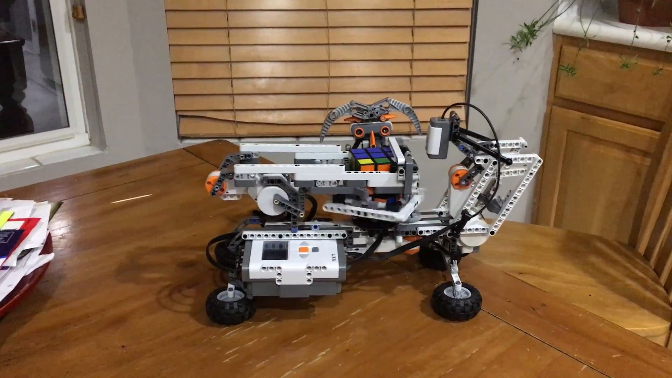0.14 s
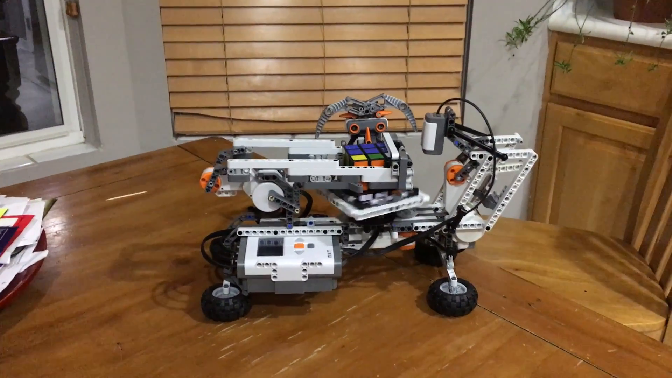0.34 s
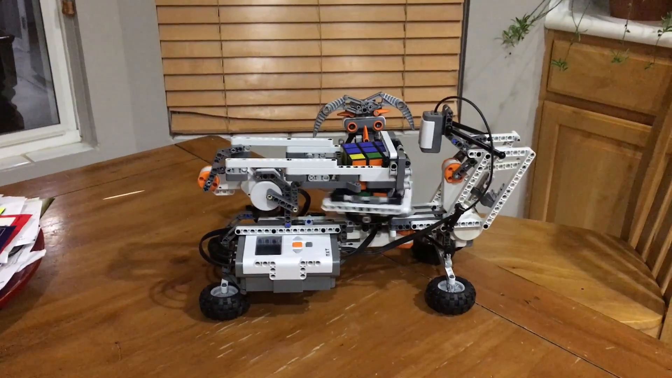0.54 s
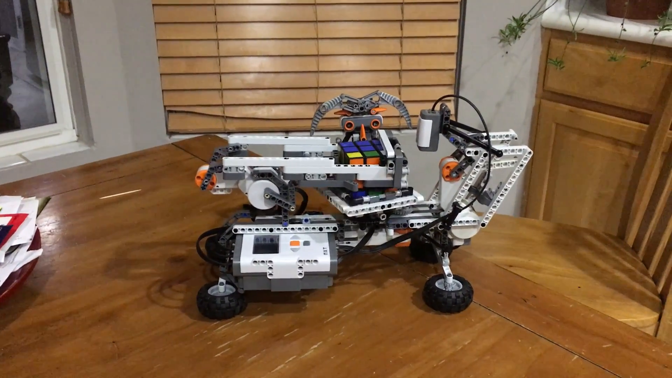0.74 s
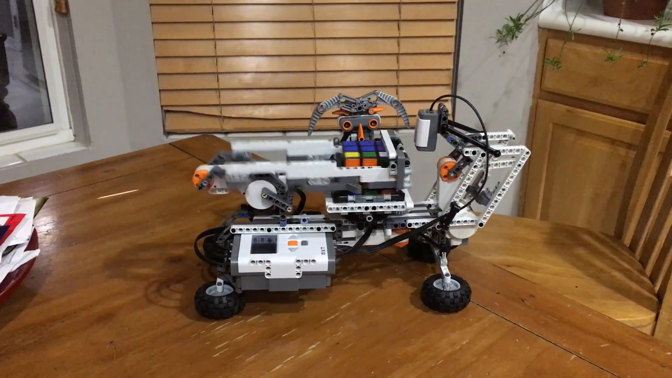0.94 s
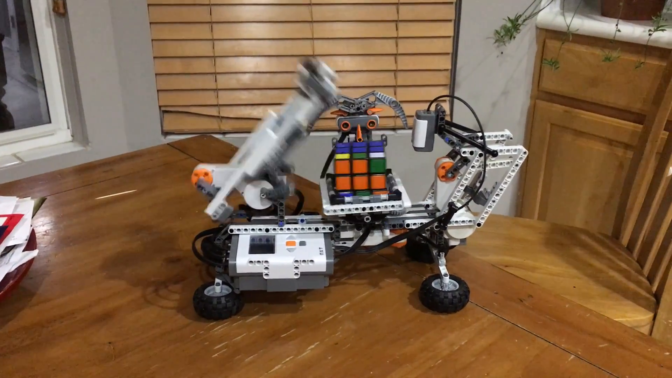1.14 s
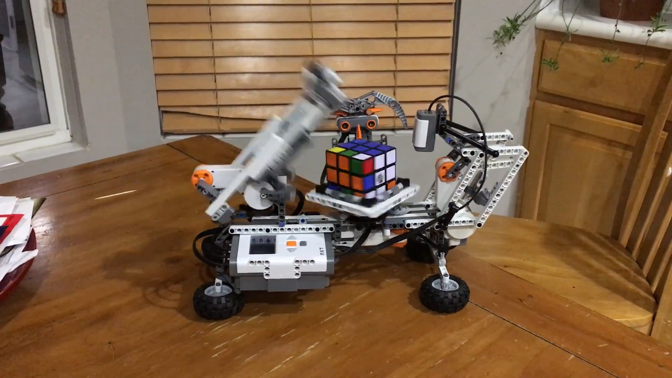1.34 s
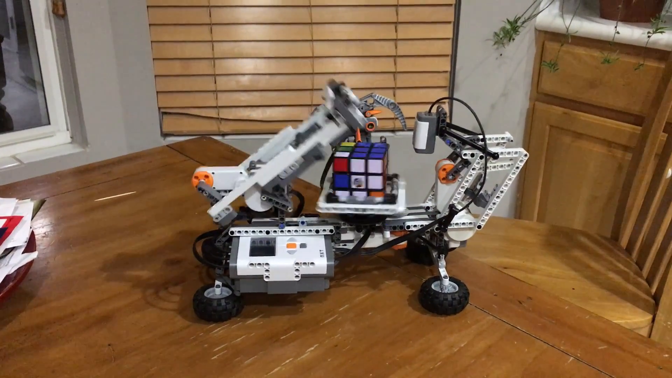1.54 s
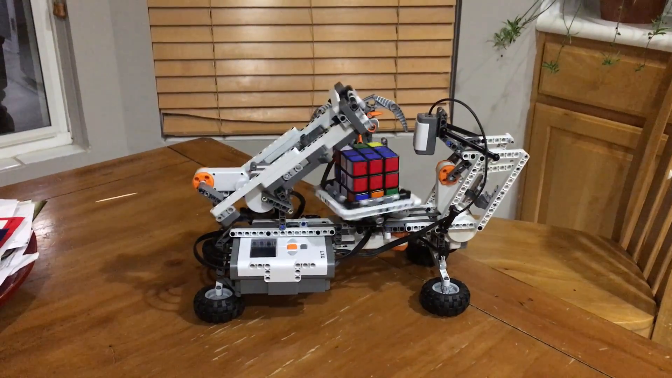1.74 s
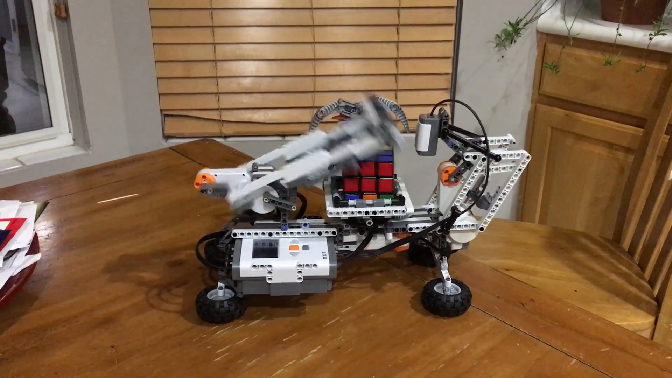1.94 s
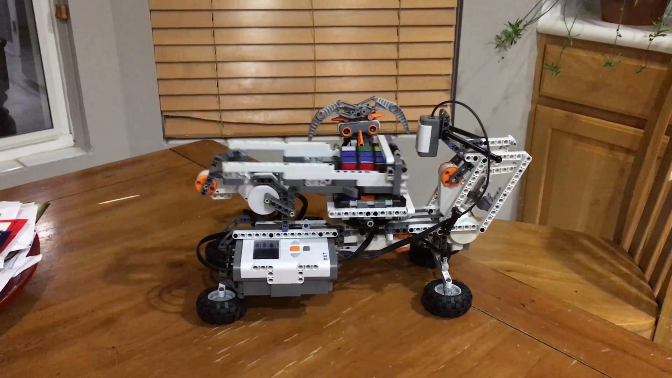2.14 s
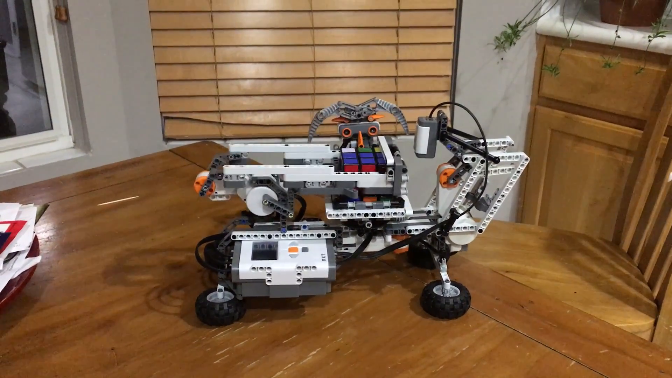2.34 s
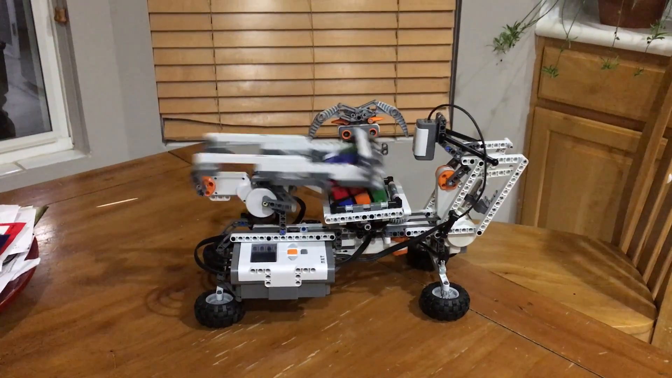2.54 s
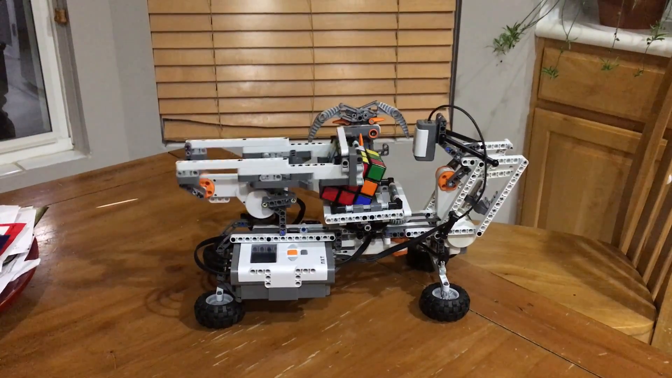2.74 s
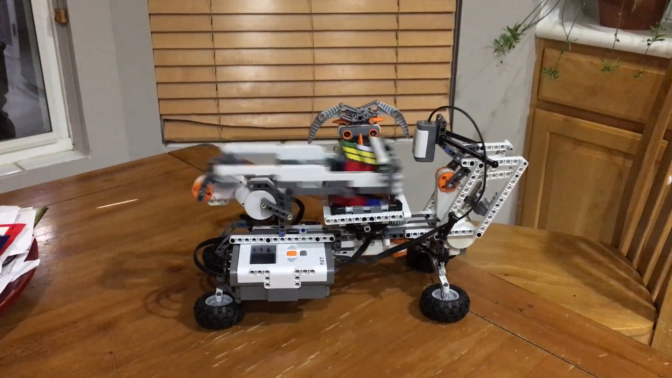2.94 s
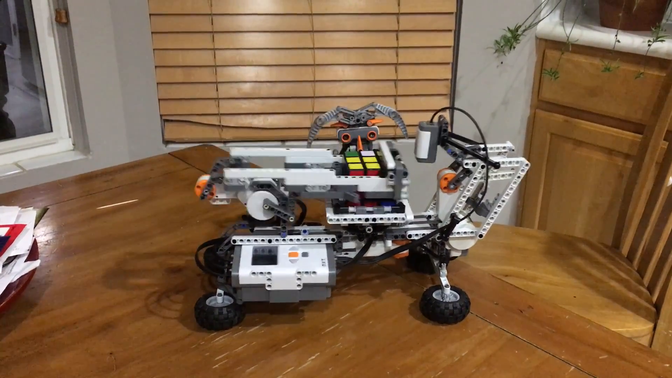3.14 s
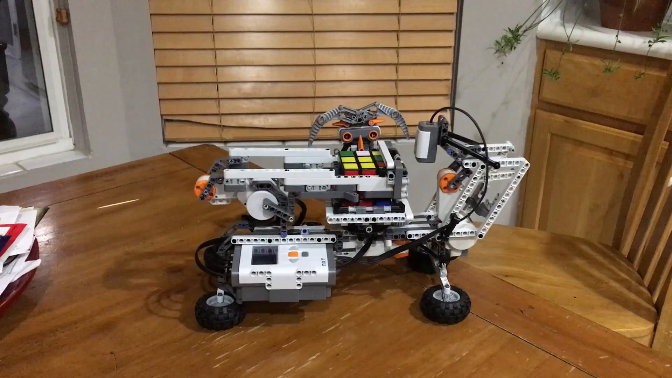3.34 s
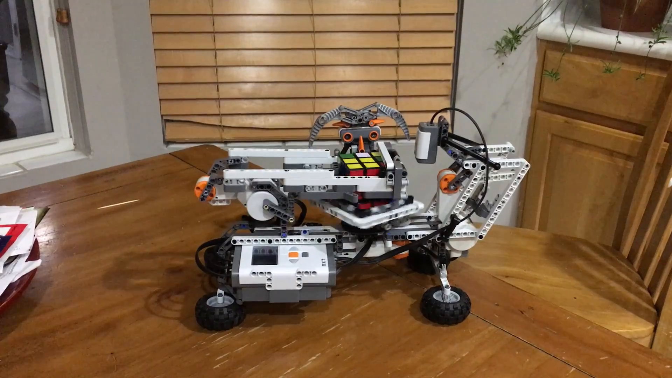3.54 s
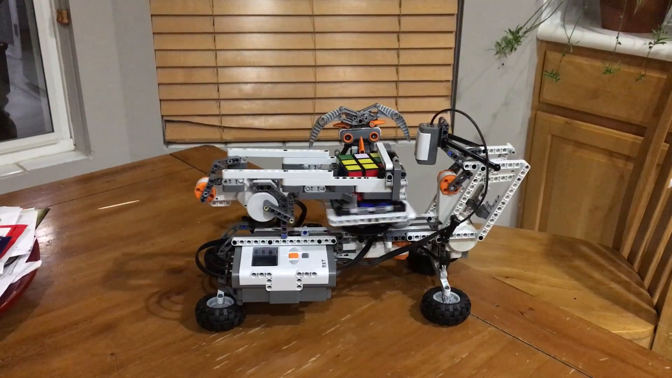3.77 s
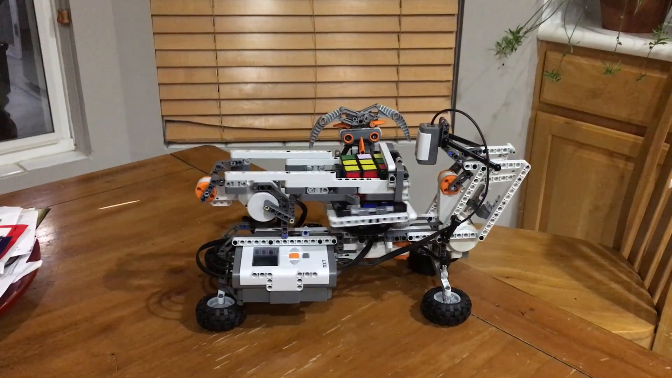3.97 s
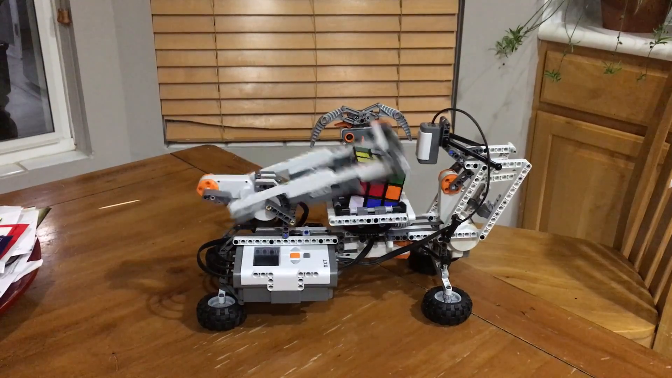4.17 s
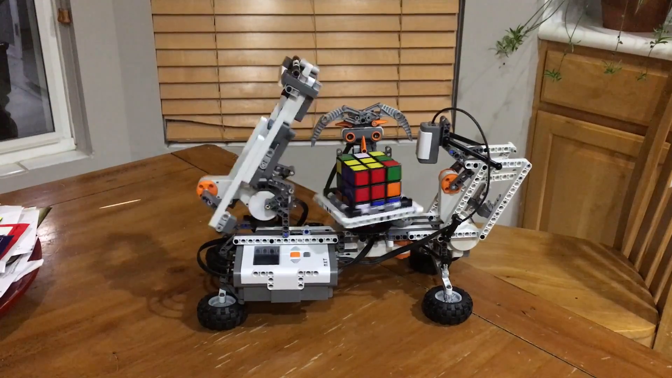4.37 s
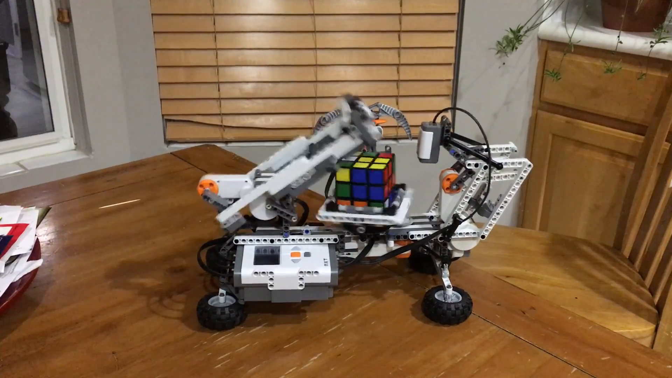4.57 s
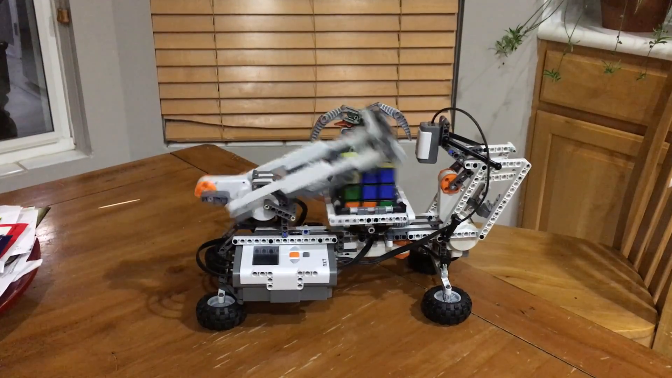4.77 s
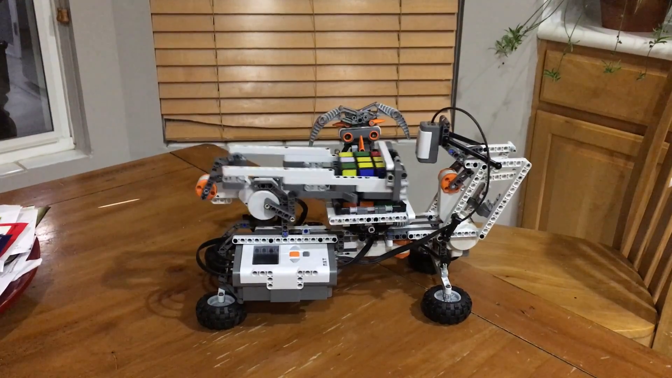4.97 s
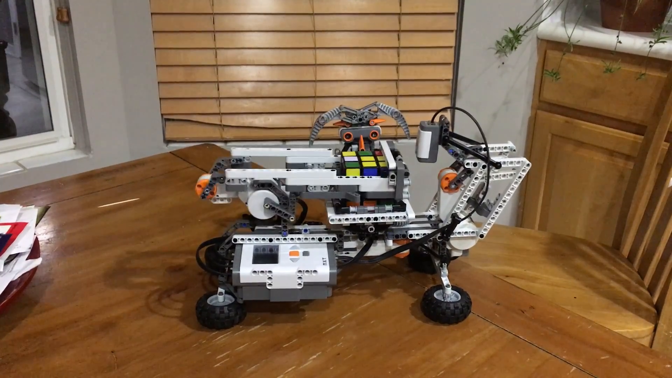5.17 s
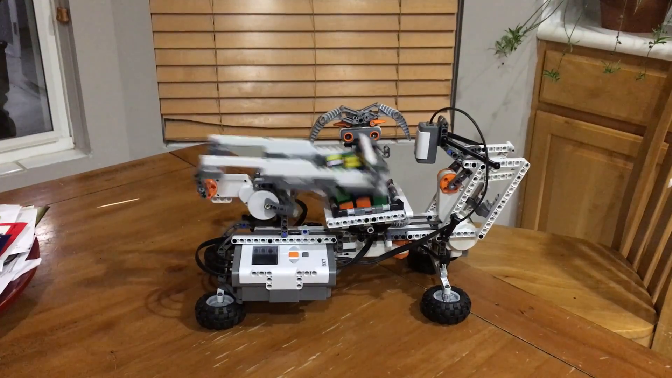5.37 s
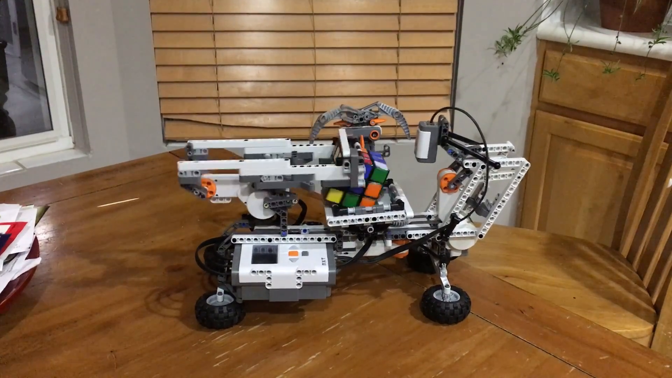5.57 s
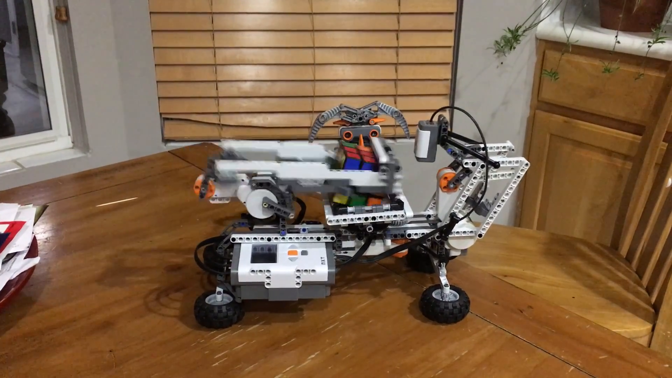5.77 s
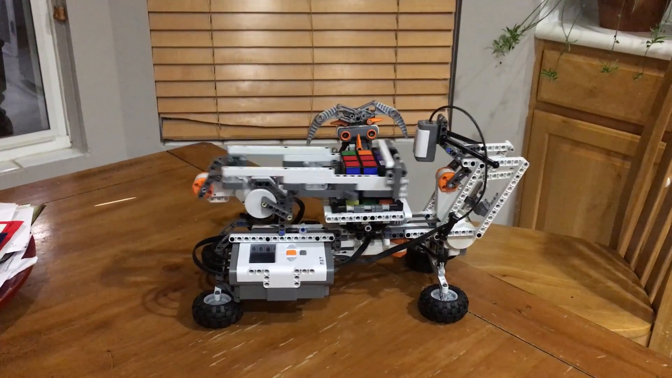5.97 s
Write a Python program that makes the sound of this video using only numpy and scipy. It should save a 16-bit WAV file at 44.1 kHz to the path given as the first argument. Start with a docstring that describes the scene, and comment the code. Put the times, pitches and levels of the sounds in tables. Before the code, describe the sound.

Close view of a plastic brick robot on a wooden table in a small, quiet room. A turntable motor grinds with a gliding whine, then an arm rasps up, plastic knocks and creaks, softer gears whir, and the arm drops with a sharp clack. Short whines push the cube over, and the cycle repeats. Faint ticking, about twenty a second, fills the gaps.

```python
"""In a small, very quiet room, a toy robot of plastic bricks turns and flips a puzzle cube on a wooden table.
Geared motors whir in bursts, made of gear noise plus tones that follow the shaft speed: one spins the
turntable, one swings the tilting arm, and lightly loaded gears whir softly. Short slips of plastic creak,
bouncing bricks clatter, and decaying low tones thump in the table. A range sensor ticks about twenty times
a second with falling blips."""
import sys
import numpy as np
from scipy import signal
from scipy.fft import rfft, irfft
from scipy.io import wavfile
from scipy.ndimage import uniform_filter1d

SR = 44100
rng = np.random.default_rng(int(sys.argv[2]) if len(sys.argv) > 2 else 0)


def to_wav(sig):
    """Store sig (one row per channel, or 1-D mono) as 16-bit WAV at the path in sys.argv[1].

    Samples outside -1..1 are clipped; the rate is SR.
    """
    pcm = np.clip(np.atleast_2d(sig), -1, 1) * 32767
    pcm = np.round(pcm).astype(np.int16)
    wavfile.write(sys.argv[1], SR, pcm.T)  # frames by channels


N = 265072
TIME = np.arange(N) / SR  # seconds


def gain_of(db):
    """Turns decibels into amplitude."""
    return 10 ** (np.asarray(db) / 20)


def evened(x):
    """Scales a signal to rms 1."""
    return x / np.sqrt(np.mean(x ** 2) + 1e-20)


def read(points, hz):
    """Reads a table between its points, on a log-frequency axis."""
    f, value = np.transpose(points)
    return np.interp(np.log(hz + 1), np.log(f + 1), value)


def add(mix, s, sound):
    """Mixes a sound in at time s, in seconds."""
    part = mix[max(round(s * SR), 0):][:len(sound)]
    part += sound[:len(part)]


def wander(hz):
    """Slow random drift of rms 1, with little movement faster than hz."""
    step, size = 16, 2 ** 15
    f = np.fft.rfftfreq(size, step / SR)
    slow = irfft(rfft(rng.standard_normal(size)) / (1 + (f / hz) ** 4))
    return evened(np.interp(np.arange(N) / step, np.arange(size), slow))


MODE_WIDTH_HZ = 80  # width of a sharp resonance where its lift in dB has halved


def ring(x, body, modes=(), size=4096):
    """Sends x through a body: a causal filter of energy 1 with the body's colour and sharp resonances."""
    f = abs(np.fft.fftfreq(size, 1 / SR))
    db = read(body, f)
    for hz, lift_db in modes:
        db = db + lift_db / (1 + (2 * (f - hz) / MODE_WIDTH_HZ) ** 2)
    # minimum phase: the body answers as promptly as its colour allows
    spectrum = np.exp(np.conj(signal.hilbert(np.log(gain_of(db)))))
    response = np.fft.ifft(spectrum).real[:size // 2]
    return signal.oaconvolve(x, response / np.linalg.norm(response))[:N]


# how long the room's echo takes to fall by 60 dB: (frequency [Hz], decay time [s])
ROOM_DECAY = [(200, 0.25), (1300, 0.29), (5000, 0.16), (15000, 0.11)]


def room(x, wet_db):
    """Direct sound plus a tail of sparse reflections, each band dying at its own speed."""
    taps = np.zeros(SR // 2)
    at = np.arange(150, len(taps) - 10, 10)
    taps[at + rng.integers(0, 10, len(at))] = rng.choice([-1., 1.], len(at))
    hz, t, z = signal.stft(taps, SR, nperseg=256)
    decay = np.exp(-np.log(1000) * t / read(ROOM_DECAY, hz)[:, None])
    tail = signal.istft(z * decay, SR)[1]
    wet = gain_of(wet_db)
    reflections = signal.oaconvolve(x, tail / np.linalg.norm(tail))[:N]
    return (x + wet * reflections) / np.hypot(1, wet)


def speckle(x, depth_db, width_hz, hold_s):
    """Random small patches of louder and softer sound give the noise an uneven grain."""
    hz, t, z = signal.stft(x, SR, nperseg=512, noverlap=384)
    field = rng.standard_normal(z.shape)
    for _ in range(2):
        field = uniform_filter1d(field, max(round(width_hz / hz[1]), 1), axis=0)
        field = uniform_filter1d(field, max(round(hold_s / t[1]), 1), axis=1)
    patches = evened(gain_of(depth_db * evened(field)))
    return signal.istft(z * patches, SR, nperseg=512, noverlap=384)[1][:N]


# colour of the room's still air: (frequency [Hz], relative level per Hz [dB])
AIR_COLOUR = [(20, -30), (130, 5), (450, -6.5), (1200, -10.5), (4000, -49)]


def still_air(level_db):
    """The room's faint, steady hiss: random noise coloured by a filter."""
    return gain_of(level_db) * evened(ring(rng.standard_normal(N), AIR_COLOUR))


# times at which the sensor starts its steady ticking afresh: (time [s])
PING_STARTS = [.036, 2.555, 4.6817]
PING_PERIOD_S = .04854


def ping_times():
    """Evenly spaced pings from each fresh start to the next."""
    ends = [s - PING_PERIOD_S / 2 for s in PING_STARTS[1:]] + [N / SR]
    runs = [np.arange(start, end, PING_PERIOD_S) for start, end in zip(PING_STARTS, ends)]
    return np.concatenate(runs)


# spells when cube and arm leave the sensor uncovered, so its pings carry; each ping scatters around this:
# (start time [s], end time [s], first level [dB], last level [dB])
UNCOVERED = [(0, 0.627, -53.5, -58), (0.637, 1.034, -61, -49), (1.04, 1.53, -57.5, -67),
             (2.047, 2.473, -52.5, -56), (2.577, 2.63, -64, -53), (3.023, 3.255, -55, -54.5),
             (3.264, 4.179, -67, -51), (4.33, 4.669, -62, -60.5), (4.895, 5.482, -53.5, -57),
             (5.881, 6.012, -52, -46)]
COVERED_DB, PING_SCATTER_DB = -79, 2.5


def ping_level(s):
    """How loud pings are at time s in dB: faint while covered, gliding through each uncovered spell."""
    levels = [COVERED_DB]
    for start, end, first_db, last_db in UNCOVERED:
        if start <= s < end:
            levels.append(np.interp(s, (start, end), (first_db, last_db)))
    return max(levels)


def sensor(start_hz, end_hz, glide_s, swell_s, echo_db):
    """Each ping is heard as a tiny falling blip, never twice the same colour, with an echo from the wall."""
    out, t = np.zeros(N), np.arange(SR // 40) / SR
    u = t / swell_s
    swell = u ** 2 * np.exp(1 - u)
    for s in ping_times():
        size, stretch, skew = rng.standard_normal(3)
        glide = np.exp(-t / (glide_s * np.exp(.18 * stretch)))
        hz = end_hz + (start_hz - end_hz) * glide
        blip = swell * np.sin(2 * np.pi * np.cumsum(hz) / SR + skew)
        blip *= gain_of(ping_level(s) + PING_SCATTER_DB * size)
        add(out, s - swell_s / 2, blip)
        add(out, s - swell_s / 2 + .0166, gain_of(echo_db) * blip)  # echo 16.6 ms later
    return room(out, wet_db=-13.5)


# the robot's weight jolts the table: (time [s], level before the shared lift [dB])
THUMPS = [(1.193, -67.5), (1.485, -54.5), (2.115, -64.5), (2.725, -73), (3.124, -61.5), (4.336, -64),
          (4.628, -59), (4.923, -59.5), (5.945, -57.5)]
# notes of the table top: (frequency [Hz], average relative level [dB], time to fall by 60 dB [s])
TABLE_MODES = [(80, -10.5, 0.094), (118, -5.5, 0.056), (142, 6.5, 0.13), (211.2, -7, 0.2), (278, 2.5, 0.1),
               (332, 4, 0.092)]


def table(thump_db, spread_db):
    """Jolts, softened by the rubber tyres, ring the table top, each in its own mix of notes."""
    out, t = np.zeros(N), np.arange(SR // 2) / SR
    swell = 1 - np.exp(-(t / .012) ** 2)
    for s, db in THUMPS:
        thump = np.zeros(len(t))
        for hz, mode_db, t60 in TABLE_MODES:
            strength = gain_of(mode_db + spread_db * rng.standard_normal())
            decay = np.exp(-np.log(1000) * t / t60)
            thump += strength * decay * np.sin(2 * np.pi * (hz * t + rng.random()))
        add(out, s, gain_of(db + thump_db) * thump * swell)
    return room(out, wet_db=-7.0)


# plastic rubs on plastic and creaks:
# (start time [s], length [s], first pitch [Hz], last pitch [Hz], level before lift, fade and scatter [dB])
CREAKS = [(0.871, 0.026, 1350, 1320, -51.5), (1.218, 0.23, 1174, 1600, -54.5),
          (2.718, 0.043, 1353, 1205, -47.5), (2.777, 0.047, 1424, 1330, -52.5),
          (3.075, .1, 1430, 1320, -48.5), (4.028, 0.032, 1322, 1240, -54),
          (4.372, 0.077, 1550, 1350, -50.5), (5.542, 0.052, 1595, 1523, -45)]
SLIPS_PER_S, SLIP_S, CREAK_FADE_DB = 150, 0.0066, -8  # average slip rate, slip length, change over a creak


def creaks(creak_db):
    """Plastic sticks and slips unevenly; each slip rings briefly, at a pitch that bends as the contact moves."""
    out, t = np.zeros(N), np.arange(round(SLIP_S * SR)) / SR
    for start, length, first_hz, last_hz, db in CREAKS:
        for s in np.arange(0, length, 1 / SLIPS_PER_S):
            late, size, detune = rng.standard_normal(3)
            progress = s / length
            hz = (first_hz + (last_hz - first_hz) * progress) * (1 + .035 * detune)
            slip = np.hanning(len(t)) * np.sin(2 * np.pi * hz * t)
            slip_db = creak_db + db + CREAK_FADE_DB * progress + 3 * size
            add(out, start + s + .3 * late / SLIPS_PER_S, gain_of(slip_db) * slip)
    return room(out, wet_db=-6)


# plastic striking plastic: (time [s], hollow knock level [dB], sharp snap level [dB]), before the shared lifts
KNOCKS = [(1.166, -45.5, -45.5), (1.464, -48, -43), (2.029, -66.5, -60), (2.081, -55, -49.5),
          (2.091, -49, -39), (2.124, -57, -55), (2.777, -56.5, -63.5), (2.988, -44, -47),
          (3.007, -49.5, -45.5), (3.039, -49.5, -49.5), (3.072, -44, -51.5), (3.328, -72, -83.5),
          (3.529, -50, -60), (4.316, -52.5, -48), (4.327, -50, -46), (4.594, -50, -38.5),
          (4.617, -50.5, -41.5), (4.851, -48.5, -52.5), (4.877, -46, -43), (4.915, -39.5, -31),
          (4.956, -44.5, -45), (5.847, -50, -54.5), (5.868, -49.5, -49), (5.903, -44, -46.5)]
# colour of the hollow cube: (frequency [Hz], relative level per Hz [dB])
KNOCK_BODY = [(60, -52), (250, -41.5), (600, -17.5), (900, -4.5), (1280, 3.5), (1700, -5.5), (2200, -8.5),
              (4000, -43.5)]
# colour of the hard edges: (frequency [Hz], relative level per Hz [dB])
SNAP_BODY = [(1200, -22), (2000, -24.5), (2750, 0.5), (4250, 2.5), (4800, -11.5), (5400, 2.5), (6800, -5),
             (9000, -0.5), (10800, -12.5), (12200, -2), (16000, -9.5)]


def clatter(knock_db, snap_db, contact_s, rattle_s):
    """Each blow sets loose bricks bouncing; the hollow cube knocks and the hard edges snap."""
    knocks, snaps, t = np.zeros(N), np.zeros(N), np.arange(SR // 4) / SR
    for s, hollow_db, sharp_db in KNOCKS:
        for part, db in (knocks, hollow_db + knock_db), (snaps, sharp_db + snap_db):
            hits = rng.random(len(t)) < 3500 / SR  # about 3500 bounces a second
            bounces = rng.standard_normal(len(t)) * hits * np.exp(-t / rattle_s)
            bounces[0] = 1
            bounces *= 1 - .8 * np.exp(-t / contact_s)  # muted at first, during contact
            add(part, s, gain_of(db) * bounces / np.linalg.norm(bounces))
    hollow = speckle(ring(knocks, KNOCK_BODY), depth_db=3.5, width_hz=170, hold_s=.03)
    sharp = speckle(ring(snaps, SNAP_BODY), depth_db=4, width_hz=340, hold_s=.02)
    return room(hollow, wet_db=-5) + room(sharp, wet_db=-6.0)


def level(moves, attack_s, release_db_per_s):
    """Each move swells in, holds while its load grows or eases, and dies away."""
    out = np.zeros(N)
    for start, length, _, _, db, swell_db in moves:
        t = TIME - start
        attack = np.clip(t / attack_s, 0, 1) ** 2
        load_db = swell_db * np.clip(t / length, 0, 1)
        release_db = release_db_per_s * np.maximum(t - length, 0)
        out += attack * gain_of(db + load_db - release_db)
    return out


EASE_AFTER_S, EASE_TURNS_PER_S2 = .56, 18  # on a long move the controller eases off


def run_up(moves, run_up_s):
    """Shaft speed in turns per second: every move glides towards its top speed, and a long one eases off."""
    speed = np.zeros(N)
    for start, length, first, top, _, _ in moves:
        t = TIME[TIME >= start] - start
        easing = EASE_TURNS_PER_S2 * np.clip(t - EASE_AFTER_S, 0, length)
        speed[TIME >= start] = top + (first - top) * np.exp(-t / run_up_s) - easing
    return speed


def shaft(speed):
    """Counts the turns of the motor shaft, whose speed trembles a little."""
    return np.cumsum(speed * (1 + .009 * wander(40))) / SR


def whine(turns, orders, rough):
    """Tones of the meshing gears; backlash smears the high ones more than the low ones."""
    tones = np.zeros(N)
    for k, db in orders:
        strength = gain_of(db + 4.6 * wander(30))
        smear = rough * k / 20 * wander(70)
        tones += strength * np.cos(2 * np.pi * k * turns + smear)
    return evened(tones)


def gear_noise(turns, body, modes):
    """Gear teeth click and slide inside a plastic housing."""
    # the motor's small gear has ten teeth; backlash makes each strike a little early or late
    struck = np.maximum.accumulate(np.floor(10 * turns + .17 * wander(250)))
    mesh = np.diff(struck, prepend=struck[0]) > 0
    teeth = evened(mesh * gain_of(4.5 * rng.standard_normal(N)))
    # off-centre gears tighten once a turn, and backlash lets the load flutter
    load = evened(gain_of(2 * np.cos(2 * np.pi * turns) + 2 * wander(220)))
    # the same worn flanks slide past on every turn, so the grit glides with the speed
    wear = rng.standard_normal(512)
    sliding = evened(np.interp(turns % 1, np.linspace(0, 1, len(wear)), wear))
    rattle = evened(ring(load * (teeth + .8 * sliding), body, modes))
    return speckle(rattle, depth_db=4.8, width_hz=240, hold_s=.04)


def servo(moves, body, orders, rough, rattle_db, whine_db, whine_growth=0, modes=(),
          attack_s=.034, run_up_s=.128, release_db_per_s=423):
    """A geared motor: noise of its teeth, plus meshing tones at multiples of the shaft speed."""
    turns = shaft(run_up(moves, run_up_s))
    effort = level(moves, attack_s, release_db_per_s)
    rattle = effort * gear_noise(turns, body, modes)
    # the harder the motor works, the more its tones stand out
    tones = evened(ring(whine(turns, orders, rough), body, modes))
    tones = tones * effort * (effort / effort.max()) ** whine_growth
    return room(gain_of(rattle_db) * rattle, wet_db=-1.5) + room(gain_of(whine_db) * tones, wet_db=-6.5)


STEADY, LOOSE = .27, .45  # smear of the tones [radians rms at 20 times shaft speed]

# lightly loaded gears; all speeds from here on are before tremble and easing, levels before trims:
# (start time [s], length [s], starting speed [turns/s], speed aimed for [turns/s], level [dB], swell [dB])
LIGHT_MOVES = [(.825, 0.1, 64.9, 65, -65, -0.5), (1.21, 0.54, 52.8, 92.9, -66, 13),
               (1.765, 0.099, 94.9, 87.3, -57.5, 0.5), (1.89, 0.21, 60.8, 72.3, -83, 26.5),
               (3.14, 0.11, 72.6, 56, -67, -8.5), (3.985, 0.074, 63.46, 64.1, -58.5, -11),
               (4.785, 0.11, 61.8, 60.4, -69, 12)]
# colour of the housing under light load: (frequency [Hz], relative level per Hz [dB])
LIGHT_BODY = [(600, -37), (1100, -10), (3000, -5.5), (4200, -6.5), (4650, -5), (5300, -7.5), (6600, -0.5),
              (8500, -11), (11000, -10.5), (16000, -24.5)]
# gear tones under light load: (multiple of shaft speed, average relative level [dB])
LIGHT_ORDERS = [(10, -3), (20, -4), (50, 0)]


def light_whirs():
    """Lightly loaded gears whir softly, some speeding up, some slowing, with weak tones."""
    return servo(LIGHT_MOVES, LIGHT_BODY, LIGHT_ORDERS, LOOSE, rattle_db=-2, whine_db=-6.5, whine_growth=1)


# the arm pushes the cube over:
# (start time [s], length [s], starting speed [turns/s], top speed [turns/s], level [dB], swell over move [dB])
PUSH_MOVES = [(2.535, 0.105, 48.79, 73.55, -62, 4), (5.37, 0.091, 51.92, 75.1, -72.5, 21.3)]
# colour of the housing during a push: (frequency [Hz], relative level per Hz [dB])
PUSH_BODY = [(800, -14), (1400, -0.5), (2400, -7), (2930, 3.5), (3300, -4.5), (4350, -2), (5050, -18.5),
             (5650, -3), (6350, -23), (7300, -6), (16000, -26)]
# gear tones during a push: (multiple of shaft speed, average relative level [dB])
PUSH_ORDERS = [(10 * k, 0) for k in range(2, 7)]


def pushes():
    """The arm's gears sing in steady tones as it pushes; a push fades more slowly than other moves."""
    return servo(PUSH_MOVES, PUSH_BODY, PUSH_ORDERS, STEADY, rattle_db=-3, whine_db=0,
                 run_up_s=.035, release_db_per_s=190)


# the arm lifts in two spurts, pulls back and strains as the cube drops, lifts again, and pulls back:
# (start time [s], length [s], starting speed [turns/s], speed aimed for [turns/s], level [dB], swell [dB])
ARM_MOVES = [(.997, 0.093, 69, 73.9, -51.5, 7.5), (1.1, 0.049, 83.5, 71.1, -43, -4.5),
             (2.88, 0.083, 68.8, 73.2, -60, 1.5), (2.97, 0.079, 71.45, 71.5, -46.5, 0.5),
             (4.15, 0.053, 69.83, 73.9, -55.5, 13.5), (4.235, 0.076, 84.66, 72, -38, -12),
             (5.72, 0.19, 68.8, 72.8, -68, 12.5)]
# colour of the arm's housing: (frequency [Hz], relative level per Hz [dB])
ARM_BODY = [(700, -38), (1600, 5), (1850, 1.5), (2150, 9.5), (2430, 3.5), (2750, -10.5), (3500, 8),
            (4300, 13), (5000, 0.5), (7500, -4.5), (10500, -18), (13000, -4), (16000, -20.5)]
# tones of the arm's gears: (multiple of shaft speed, average relative level [dB])
ARM_ORDERS = [(20, 0), (30, 2), (40, -2), (50, -4), (60, -8)]


def arm():
    """The arm's gears rasp as it lifts and pulls back, with loose, smeared tones."""
    return servo(ARM_MOVES, ARM_BODY, ARM_ORDERS, LOOSE, rattle_db=-4, whine_db=.5, whine_growth=.3)


# the turntable spins the cube:
# (start time [s], length [s], starting speed [turns/s], top speed [turns/s], level [dB], swell over move [dB])
TURNTABLE_MOVES = [(-.06, 0.8, 65, 83.3, -45.5, -0.46), (3.46, 0.42, 59.7, 85.5, -46, 1.5),
                   (4.345, 0.35, 79, 88, -59.5, 13)]
# colour of the turntable's housing: (frequency [Hz], relative level per Hz [dB])
TURNTABLE_BODY = [(500, -40), (1100, -14.5), (1550, -2.5), (2200, -3), (2800, -14), (3300, -5),
                  (4600, -5.5), (6100, -5), (6900, -17.5), (8300, -15), (9550, 0), (10600, -22), (13200, 0),
                  (16000, -18)]
# sharp resonances of its frame, which flare as a tone glides through them: (frequency [Hz], lift [dB])
TURNTABLE_MODES = [(1875, 5), (4490, 7), (6085, 9)]
# tones of the turntable's gears: (multiple of shaft speed, average relative level [dB])
TURNTABLE_ORDERS = [(20, 4), (23, 0), (26, -6), (30, 1), (40, -1), (43, -2), (50, -3), (56, -2), (65, -3),
                    (76, -3)]


def turntable():
    """The turntable's gears grind; being heavy, it takes up its load more slowly than the arm."""
    return servo(TURNTABLE_MOVES, TURNTABLE_BODY, TURNTABLE_ORDERS, STEADY, rattle_db=-2, whine_db=-1,
                 whine_growth=.5, modes=TURNTABLE_MODES, attack_s=.085, run_up_s=.2)


def scene():
    """Still air, sensor, table, creaks and clatter, with the motors as the main source."""
    air = still_air(level_db=-83)
    pings = sensor(start_hz=1253, end_hz=150, glide_s=0.0017, swell_s=0.0011, echo_db=-14)
    thumps = table(thump_db=8.0, spread_db=4.0)
    bricks = clatter(knock_db=31.5, snap_db=26.5, contact_s=0.0026, rattle_s=0.014)
    motors = light_whirs() + pushes() + arm() + turntable()
    return (air + pings + thumps + creaks(creak_db=2.5) + bricks + motors)[None]


def record(dry):
    """Cuts off the treble steeply around 15.9 kHz."""
    low_pass = signal.firwin(511, 15900, window=("kaiser", 9), fs=SR)
    return signal.oaconvolve(dry, low_pass[None], "same")


dry = scene()
out = record(dry)
to_wav(out)
```